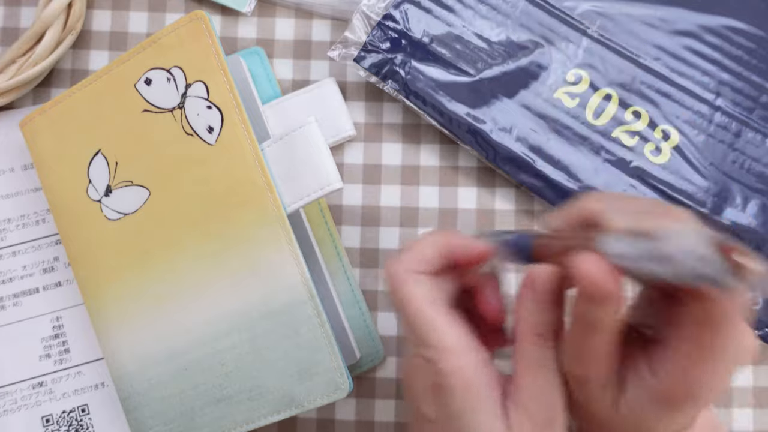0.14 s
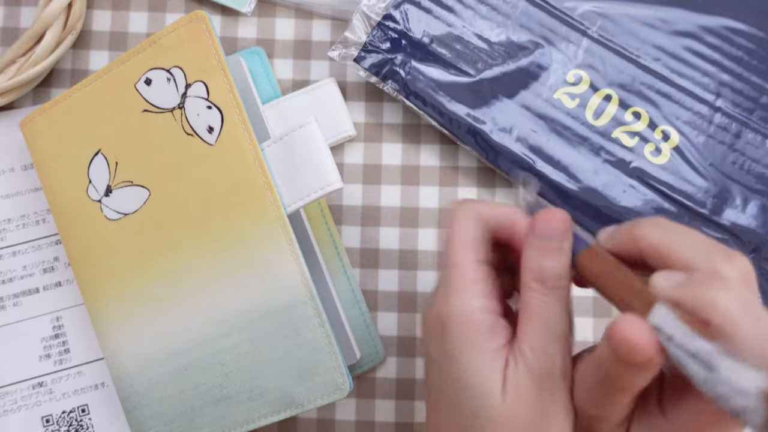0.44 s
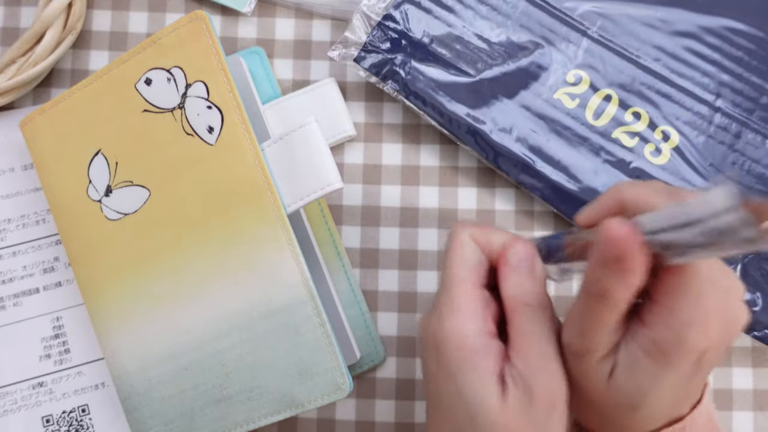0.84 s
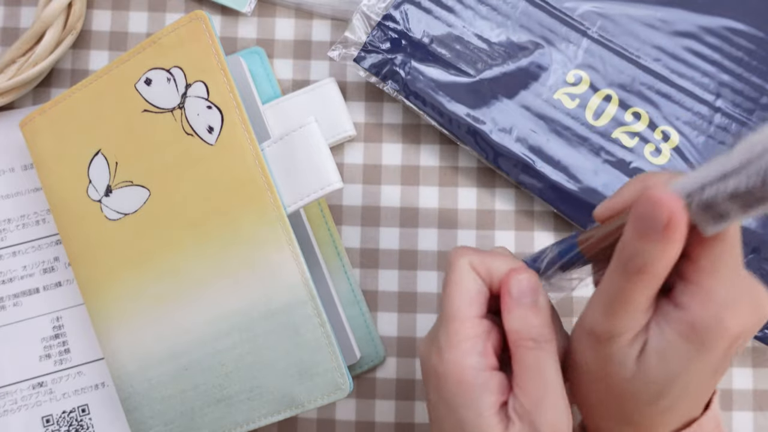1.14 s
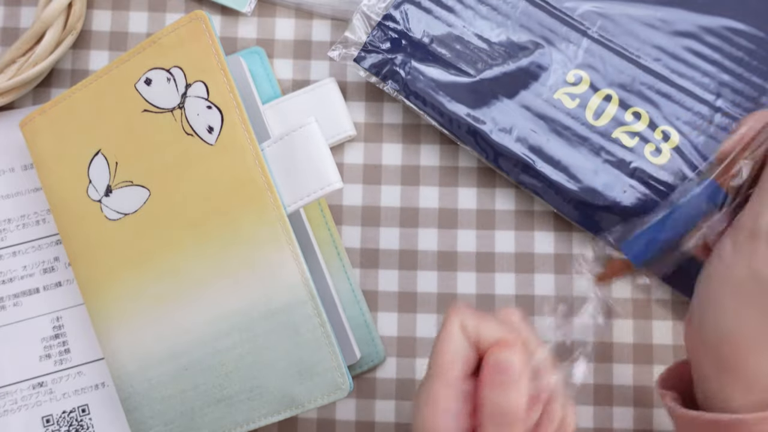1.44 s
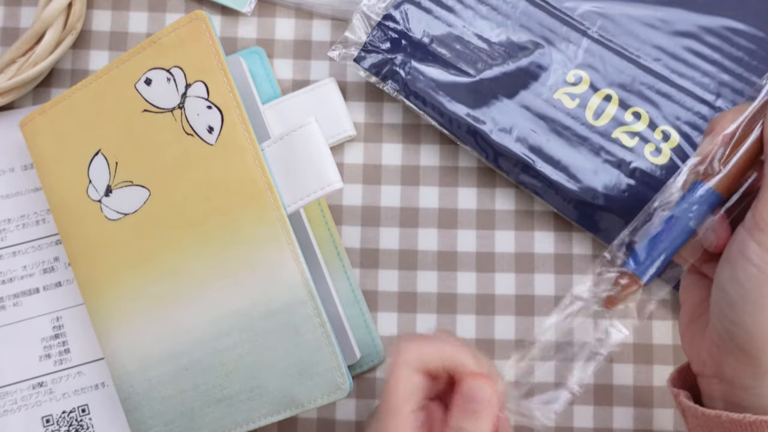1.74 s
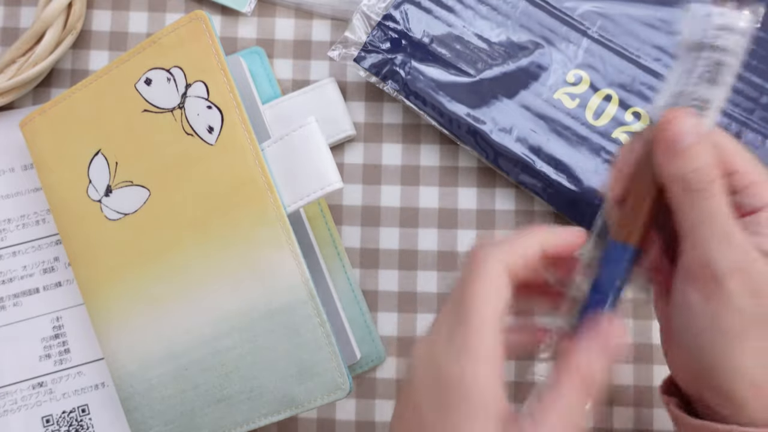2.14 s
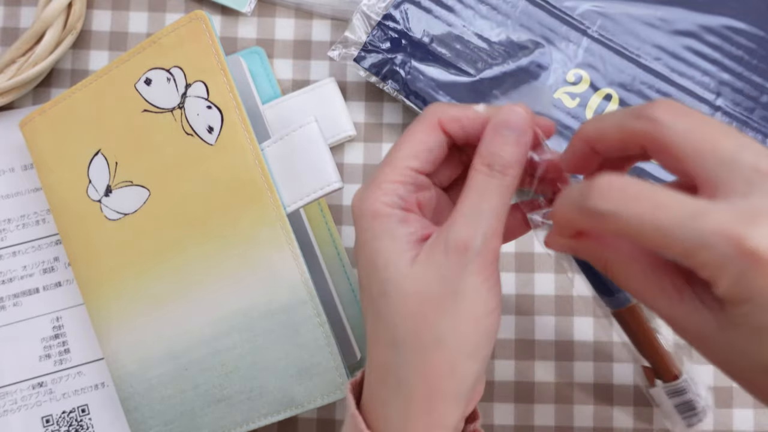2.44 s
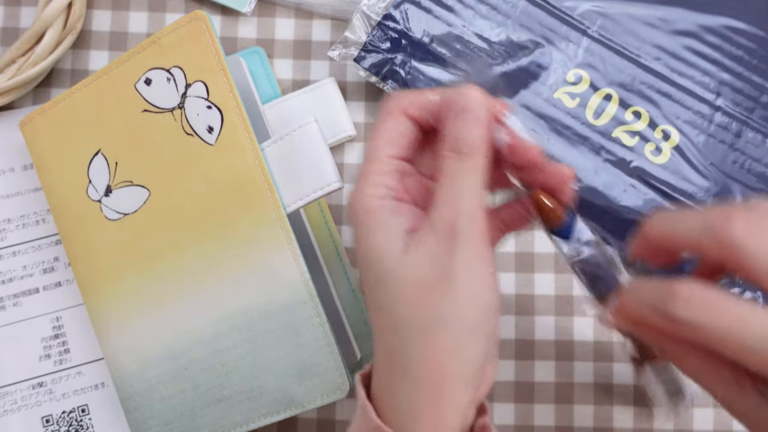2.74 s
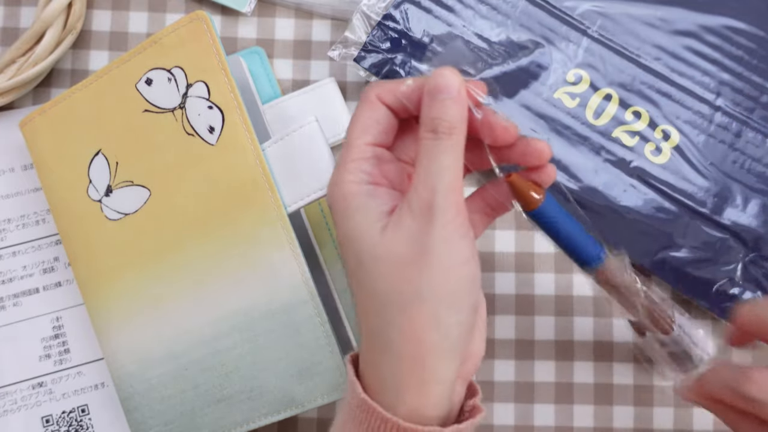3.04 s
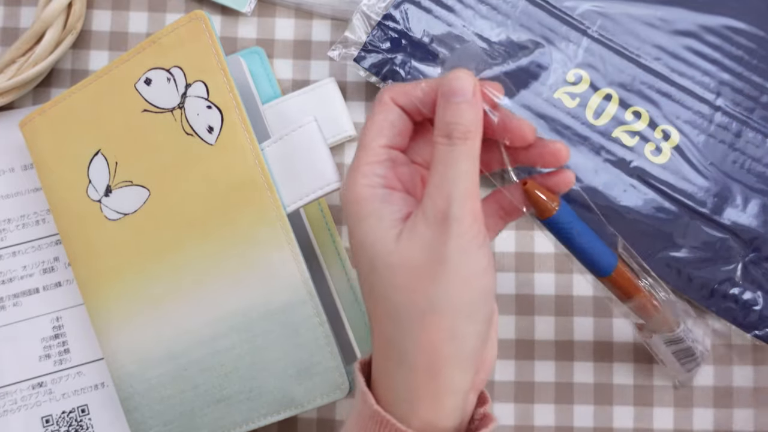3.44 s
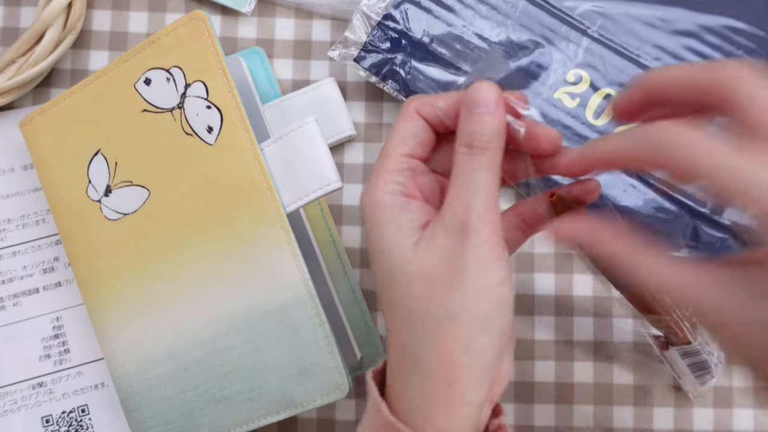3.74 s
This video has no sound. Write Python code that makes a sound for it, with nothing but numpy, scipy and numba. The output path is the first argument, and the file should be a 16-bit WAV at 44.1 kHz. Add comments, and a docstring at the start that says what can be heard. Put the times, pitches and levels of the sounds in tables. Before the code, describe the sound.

A thin plastic pen sleeve crinkles in hands: light scattered ticks, a dense bright crackling burst, a brief pause, then renewed scrunching that thins to sparse faint crackles. Close microphone, small quiet room, nearly mono.

```python
"""A small quiet room: two hands work a pen about in its thin clear plastic sleeve, close to a microphone.
Creases snap through one by one, each a tick and the brief ring of a patch of film. Under them lie a fine
crackle of tiny buckles and sliding film, gliding strokes and a dull finger rub; now and then something pops or
clicks. The film thins in tone as it is pulled taut. The hands pause, then grip again and scrunch the open end.
Quick reflections, a short room tail and steady room tone surround the sleeve, nearly mono."""
import sys
import numpy as np
from scipy import signal
from scipy.fft import rfft, irfft
from scipy.io import wavfile
from scipy.ndimage import uniform_filter1d, minimum_filter1d
from numba import njit

SR = 44100
rng = np.random.default_rng(int(sys.argv[2]) if len(sys.argv) > 2 else 0)


def unload_audio(sound):
    """Save the sound as a 16-bit wav file, at the path given as the first command line argument."""
    columns = np.transpose(np.atleast_2d(sound))
    # keep every value between -1 and 1, then stretch to whole-number steps
    steps = np.round(np.clip(columns, -1, 1) * 32767)
    wavfile.write(sys.argv[1], SR, steps.astype(np.int16))


N = 171990

# Large creases: flutter decay [s], trims of tick and ring [dB]
TICK_S, TICK_DB, RING_DB = 0.00044, -3.5, -4
TICK_BELOW, TICK_ABOVE = 0.25, 3.4  # edges of a snap's band, as multiples of its patch's pitch
AFTER_S, AFTER_DB = .0035, -8  # a snap sets off a neighbouring crease within this time
# Ringing patch: decay [s] at a reference pitch [Hz], rise [s], power by which higher pitches die sooner
RING_S, RING_AT_HZ, RISE_S, RING_SLOPE = 0.00057, 3000, 0.00029, .5
RING_SAG = 0.018  # share by which the pitch relaxes as the patch settles
# Fine crackle: mean rate, spread of buckle sizes [dB], sliding film against the buckles [dB]
BUCKLES_PER_S, BUCKLE_SPREAD_DB, SLIDE_DB = 950, 6, -9
BUCKLE_TICK = 1.88  # gain of a buckle's tick against a ring at RING_AT_HZ
LOW_HZ, MIDDLE_HZ, TREBLE_HZ = 319, 1100, 5000  # lower edges of the crackle's bands
# Treble above FIZZ_HZ gains FIZZ_GROWTH dB per dB of treble level over FIZZ_AT_DB, and loses as much under it
FIZZ_HZ, FIZZ_AT_DB, FIZZ_GROWTH = 10600, -27, .35
HOLLOW_WIDTH_HZ = 490  # bandwidth of each of the hollow's two poles
FILM_DAMPING = 1.082
POP_T60_S, POP_AT_HZ = 0.0085, 1000  # lower pops ring longer
POP_TICK_DB, POP_LOW_HZ = -9, 332  # level of the tick that starts a pop; pops carry little bass
DESK_DB, DESK_S = -9, 0.0059  # reflections: level, decay
ROOM_DB, SIDE_GAIN = -33.5, 0.052  # tail level; gain of the second tail that makes the side signal
AIR_DB = -59
CEILING, EDGE_HZ = .29, 15850  # limiter height, upper band edge


def amp(db):
    """Decibels to gain."""
    return 10 ** (np.asarray(db) / 20)


def unit(x):
    """Scales to rms 1."""
    return x / np.sqrt(np.mean(x ** 2) + 1e-20)


def read(points, hz):
    """Reads a table along log frequency."""
    f, value = np.transpose(points)
    return np.interp(np.log(hz + 1), np.log(f + 1), value)


def colour(x, points, size=2048):
    """Causal minimum-phase filter with the given spectrum; keeps the power of white noise."""
    log_gain = np.log(amp(read(points, abs(np.fft.fftfreq(size, 1 / SR)))))
    response = np.exp(np.conj(signal.hilbert(log_gain)))
    taps = np.fft.ifft(response).real[:size // 2]
    return signal.oaconvolve(x, taps / np.linalg.norm(taps))[:len(x)]


def above(x, hz, order=8):
    """The part of a sound above a soft edge; with what lies below it adds up to the whole."""
    f = np.fft.rfftfreq(N, 1 / SR)
    return irfft(rfft(x) * f ** order / (f ** order + float(hz) ** order), N)


def add(mix, s, sound):
    """Mixes a sound in at a time."""
    part = mix[max(round(s * SR), 0):][:len(sound)]
    part += sound[:len(part)]


def burst(x):
    """Gives a short sound the energy of 2 ms at rms 1."""
    return x * np.sqrt(.002 * SR / np.sum(x ** 2))


def tick(size=600):
    """A crease jumps: one sharp kick and a quickly dying flutter."""
    t = np.arange(size) / SR
    flutter = rng.standard_normal(size) * np.exp(-t / TICK_S)
    flutter[0] += 2 * rng.choice([-1, 1])
    return burst(flutter)


def ring(hz, size=900):
    """A patch of film swings for a few cycles, its pitch relaxing."""
    t = np.arange(size) / SR
    life = RING_S * (RING_AT_HZ / hz) ** RING_SLOPE
    turns = np.cumsum(hz * (1 + RING_SAG * (np.exp(-t / life) - .5))) / SR
    swing = np.sin(2 * np.pi * (turns + rng.random()))
    return burst((1 - np.exp(-t / RISE_S)) * np.exp(-t / life) * swing)


def snaps():
    """The large creases: a tick, a ring and a weaker after-tick; large patches tick duller than small ones."""
    # Creases snapping: (time [s], level before the tick and ring trims [dB], ring pitch [Hz])
    creases = [(0.0183, -28, 8450), (0.0427, -28.5, 8400), (0.1096, -27.5, 9200), (0.1576, -19.5, 6720),
               (0.177, -28.5, 3080), (0.232, -28.5, 7940), (0.2737, -21.5, 7700), (0.297, -27, 8000),
               (0.3141, -27, 7940), (0.3385, -21, 6420), (0.3536, -25, 2360), (0.399, -33, 6460),
               (0.4691, -43, 3270), (0.488, -51.5, 4400), (0.5393, -40.5, 1940), (0.583, -33.5, 7100),
               (0.6668, -35, 4900), (0.75, -16.5, 8360), (0.755, -20.5, 2480), (0.769, -14, 8500),
               (0.7974, -22, 5700), (0.8245, -30, 5300), (0.832, -21.5, 9500), (0.86, -25.5, 2980),
               (0.867, -20.5, 1560), (0.8708, -17, 1520), (0.8889, -20, 8700), (0.893, -23, 9150),
               (0.8981, -19.5, 1920), (0.9105, -21, 2560), (0.9172, -24, 3470), (0.9502, -19, 2220),
               (0.9865, -22.5, 9200), (0.9926, -25, 2560), (1.0155, -26, 3370), (1.049, -25.5, 1400),
               (1.0618, -24, 2520), (1.0913, -23, 2460), (1.106, -19, 9400), (1.1144, -22, 4700),
               (1.1373, -22, 3700), (1.1673, -26, 9400), (1.179, -23, 4520), (1.1826, -29, 1620),
               (1.2143, -23, 2240), (1.291, -23, 1930), (1.3047, -18, 6850), (1.311, -20.5, 2480),
               (1.3266, -11, 7900), (1.3346, -25, 1550), (1.355, -16, 8300), (1.3653, -18, 8700),
               (1.3697, -22.5, 9800), (1.382, -21, 5000), (1.3913, -15, 4370), (1.4, -20.5, 1810),
               (1.4226, -21.5, 1710), (1.4581, -23, 2040), (1.471, -17.5, 2980), (1.477, -16.5, 8800),
               (1.5486, -22, 3050), (1.5579, -21, 2980), (1.5618, -22, 6800), (1.5729, -17, 9350),
               (1.583, -19, 6940), (1.6009, -22, 8600), (1.6206, -23, 4730), (1.6327, -17.5, 8200),
               (1.6436, -29, 9800), (1.6645, -21.5, 8400), (1.6845, -22, 9100), (1.7117, -21, 3100),
               (1.744, -34, 5170), (1.7556, -31, 3250), (1.7917, -26, 8400), (1.801, -26.5, 3350),
               (1.8077, -22.5, 3240), (1.8455, -27, 3170), (1.8834, -28, 8700), (1.91, -30.5, 3900),
               (1.9379, -31.5, 5000), (2.069, -51, 3850), (2.2187, -30.5, 2720), (2.2317, -31, 7400),
               (2.2693, -21, 5560), (2.2776, -24, 3650), (2.3338, -28, 5760), (2.3649, -23, 5300),
               (2.3744, -23.5, 2980), (2.384, -20, 4270), (2.391, -21, 1980), (2.397, -19, 3000),
               (2.425, -22, 8400), (2.43, -17.5, 1100), (2.4356, -20.5, 8800), (2.456, -22.5, 1180),
               (2.4864, -19.5, 2860), (2.5279, -24, 1760), (2.5323, -17, 2670), (2.542, -12, 3060),
               (2.558, -19, 2860), (2.5707, -25, 980), (2.5754, -19.5, 3060), (2.5857, -24, 2900),
               (2.5943, -13, 2480), (2.602, -15, 2550), (2.607, -21.5, 1110), (2.614, -22.5, 1850),
               (2.6224, -22.5, 2940), (2.6283, -17, 5640), (2.6371, -26, 2350), (2.6425, -19, 8400),
               (2.6526, -16.5, 2920), (2.6629, -21.5, 2700), (2.678, -22, 7160), (2.6946, -22, 8400),
               (2.7088, -20.5, 3070), (2.734, -23, 5370), (2.7438, -31, 4650), (2.756, -15, 4700),
               (2.7797, -21, 1410), (2.8552, -25.5, 8500), (2.8739, -21, 3320), (2.885, -23.5, 8740),
               (2.9347, -16.5, 8400), (2.945, -23.5, 1120), (2.96, -25, 2110), (3.02, -18, 2020),
               (3.0292, -17.5, 8800), (3.0378, -21.5, 1330), (3.0547, -26, 1220), (3.0714, -22, 1040),
               (3.081, -19, 8800), (3.1066, -21, 9300), (3.1368, -22.5, 2580), (3.1574, -19.5, 7500),
               (3.181, -24, 9500), (3.1887, -19.5, 8400), (3.197, -26, 3850), (3.2497, -35, 8440),
               (3.323, -25, 2000), (3.4205, -27.5, 4500), (3.424, -29.5, 4800), (3.55, -35, 3600),
               (3.571, -35.5, 4330), (3.6462, -40, 2280), (3.6568, -38, 4380), (3.8538, -42, 5860)]
    # Colour of a tick: (frequency [Hz], relative level [dB])
    tick_colour = [(100, -29), (400, -7), (1000, 3), (2400, 5.5), (6300, 2.5), (8700, 5.5), (10500, -4.5),
                   (13500, -5), (16000, -14.5)]
    out = np.zeros(N)
    body = colour(np.r_[1, np.zeros(599)], tick_colour)
    for s, db, hz in creases:
        low, high = np.clip([hz * TICK_BELOW, hz * TICK_ABOVE], 1, .48 * SR)
        low_cut = signal.butter(2, low, "high", fs=SR, output="sos")
        high_cut = signal.butter(1, high, fs=SR, output="sos")
        band = np.vstack([low_cut, high_cut])
        for delay, drop_db in [(0, 0), (AFTER_S * rng.random(), AFTER_DB)]:
            crack = signal.sosfilt(band, np.convolve(tick(), body))
            add(out, s + delay, amp(db + TICK_DB + drop_db) * burst(crack))
        patch = signal.sosfilt(band, ring(hz))
        add(out, s, amp(db + RING_DB) * burst(patch))
    return out


def crackle(count=48):
    """Many tiny buckles of all sizes over the hiss of sliding film, swelling in three bands."""
    # Fine crackle before the band trims: (time [s], low level [dB], middle level [dB], treble level [dB])
    crackle_levels = [(0.019, -49.5, -36.5, -42.5), (0.093, -40, -35, -36), (0.139, -53, -50, -56),
                      (0.175, -64, -41, -41.5), (0.258, -62, -46, -51), (0.308, -55, -47, -46),
                      (0.337, -37.5, -34, -38), (0.419, -67, -49.5, -50), (0.504, -59, -78, -79),
                      (0.555, -74, -50, -45.5), (0.627, -70, -73, -68.5), (0.721, -48, -38, -38.5),
                      (0.893, -55, -35, -37.5), (1.247, -83, -37.5, -29), (1.491, -38, -35.5, -43.5),
                      (1.541, -56, -46, -41), (1.554, -33.5, -26.5, -46), (1.646, -69, -51, -42),
                      (1.684, -32, -30.5, -34.5), (1.746, -63, -54, -56.5), (1.821, -41, -34, -35),
                      (1.866, -64, -40, -43), (1.927, -44, -38, -37), (1.995, -67, -68.5, -83.5),
                      (2.156, -67.5, -74, -81.5), (2.223, -42, -33.5, -35.5), (2.255, -66, -48, -47),
                      (2.27, -44, -39.5, -37.5), (2.33, -57, -41.5, -37.5), (2.375, -44.5, -28, -31.5),
                      (2.43, -42, -35, -39.5), (2.569, -33, -26.5, -38.5), (2.699, -44.5, -40.5, -39),
                      (2.727, -33.5, -25.5, -30.5), (2.859, -35.5, -29.5, -39), (2.898, -35, -31, -34),
                      (3.159, -42.5, -31, -33), (3.218, -48, -49, -51), (3.288, -50.5, -45, -54.5),
                      (3.323, -42.5, -36.5, -45), (3.368, -54, -46.5, -51), (3.413, -53.5, -36.5, -38.5),
                      (3.502, -47, -62, -83), (3.542, -47, -45.5, -54), (3.677, -51, -41, -51),
                      (3.725, -50, -51, -64), (3.783, -47, -53.5, -63), (3.85, -58.5, -40, -38),
                      (3.896, -46.5, -36.5, -43)]
    # Colour of the fine crackle: (frequency [Hz], relative level [dB])
    film_colour = [(200, 0.5), (700, 2), (2500, 3), (3600, 0.5), (5000, 0.5), (6400, -4.5), (8600, 0.5),
                   (10500, -7.5), (13500, -10.5), (16000, -15)]
    # Trims of the bands: low [dB], middle [dB], treble [dB]
    band_trims = [-3.5, -5, -2.5]
    strength = amp(BUCKLE_SPREAD_DB * np.minimum(rng.exponential(1, N), 3.1))
    buckles = strength * (rng.random(N) < BUCKLES_PER_S / SR)
    patch = rng.integers(0, count, N)  # which pitch each buckle rings at
    slide = rng.standard_normal(N)
    grains = np.zeros(N)
    for k, hz in enumerate(np.geomspace(500, 14000, count)):
        grain = ring(hz) * np.sqrt(hz / RING_AT_HZ)
        add(grain, 0, BUCKLE_TICK * tick(size=40))
        grains += signal.oaconvolve(buckles * (patch == k), grain)[:N]
    film = colour(unit(grains) + amp(SLIDE_DB) * slide, film_colour)

    times, *columns = np.transpose(crackle_levels)
    levels = [np.interp(np.arange(N) / SR, times, column) for column in columns]
    low, middle, treble = (above(film, hz) for hz in (LOW_HZ, MIDDLE_HZ, TREBLE_HZ))
    out = np.zeros(N)
    for band, level, trim in zip([low - middle, middle - treble, treble], levels, band_trims):
        running_rms = np.sqrt(abs(uniform_filter1d(band ** 2, size=1500)) + 1e-12)
        out += amp(level + trim) * band / running_rms
    fizz_gain = amp(FIZZ_GROWTH * (levels[-1] - FIZZ_AT_DB))
    return out + above(out, FIZZ_HZ) * (fizz_gain - 1)


def strokes():
    """Grainy friction sounds the hollow of the sleeve, whose pitch glides as its shape changes."""
    # Strokes over the film: (time [s], length [s], level [dB], start pitch [Hz], end pitch [Hz])
    slides = [(0.39, 0.3, -63, 1420, 2230), (0.792, 0.68, -42.5, 2040, 2800), (1.548, 0.1, -38, 1100, 840),
              (2.733, 0.13, -33, 1470, 950), (2.81, 0.096, -30.5, 770, 576)]
    out = np.zeros(N)
    r = np.exp(-np.pi * HOLLOW_WIDTH_HZ / SR)
    for s, length, db, start_hz, end_hz in slides:
        done = np.clip((np.arange(N) / SR - s) / length, 0, 1)
        pitch = start_hz * (end_hz / start_hz) ** done
        turn = np.exp(2j * np.pi * np.cumsum(pitch) / SR)
        friction = rng.standard_normal(N) * rng.exponential(1, N)
        # Shift the gliding pitch down to zero, resonate there and shift back
        hollow = (turn * signal.lfilter([1], np.poly([r, r]), friction / turn)).real
        out += amp(db) * np.sin(np.pi * done) * unit(hollow)
    return out


@njit
def high_pass(x, step, damping):
    """Resonant high-pass whose edge moves from sample to sample."""
    out, low, band = np.zeros(len(x)), 0., 0.
    for i in range(len(x)):
        g = step[i]
        out[i] = (x[i] - (damping + g) * band - low) / (1 + g * (damping + g))
        low += 2 * g * (band + g * out[i])
        band += 2 * g * out[i]
    return out


def radiate(x):
    """The film radiates little below its lowest resonance, which rises as it is pulled taut."""
    # Lowest resonance of the free film, high when taut and low when slack: (time [s], frequency [Hz])
    tautness = [(0, 520), (0.27, 1000), (0.32, 380), (0.7, 350), (0.79, 800), (0.87, 720), (0.96, 1350),
                (1.29, 1000), (1.41, 470), (2.75, 450), (2.93, 268)]
    edge_hz = np.interp(np.arange(N) / SR, *np.transpose(tautness))
    step = np.tan(np.pi * edge_hz / SR)
    return high_pass(high_pass(x, step, FILM_DAMPING), step, FILM_DAMPING)


def pops(size=2000):
    """A pop or click: a tick, then a brief ring in a few modes."""
    # Pops and clicks, all ringing in one set of modes: (time [s], level [dB], lowest mode [Hz])
    knocks = [(0.315, -36, 296), (0.353, -37, 397), (0.3728, -29.5, 567), (0.6948, -26.5, 266),
              (1.6727, -25, 287), (2.9157, -23, 520), (2.964, -20.5, 316), (3.331, -30.5, 620),
              (3.525, -26, 1060), (3.6892, -30, 630)]
    # Modes of a pop or click: (multiple of the lowest mode, relative level [dB])
    pop_modes = [(1, -2.5), (2.81, 3), (3.55, 1.5), (5.3, -7)]
    t, out = np.arange(size) / SR, np.zeros(N)
    for s, db, hz in knocks:
        t60 = POP_T60_S * np.sqrt(POP_AT_HZ / hz)
        modes = np.zeros(size)
        for k, (ratio, mode_db) in enumerate(pop_modes):
            modes += amp(mode_db) * np.sin(2 * np.pi * hz * ratio * t) * (-1) ** k
        crack_hz = min(hz * pop_modes[-1][0] + 1500, .45 * SR)
        crack = signal.lfilter(*signal.butter(2, crack_hz, fs=SR), tick())
        add(out, s, amp(db) * burst(amp(-60 * t / t60) * modes))
        add(out, s, amp(db + POP_TICK_DB) * burst(crack))
    return signal.sosfilt(signal.butter(3, POP_LOW_HZ, "high", fs=SR, output="sos"), out)


def fingers(level_db=-2):
    """Skin rubs and nudges the sleeve: low-coloured noise makes a soft rustle."""
    # Dull rubbing on sleeve and pen, before the trim level_db: (time [s], level [dB])
    handling = [(2.3, -65), (2.85, -53.5), (3.78, -51), (3.9, -72)]
    # Colour of the rubbing: (frequency [Hz], relative level [dB])
    finger_colour = [(30, -47.5), (80, -16.5), (140, -7), (220, 2), (350, -4), (1200, -49)]
    level = np.interp(np.arange(N) / SR, *np.transpose(handling))
    return amp(level + level_db) * unit(colour(rng.standard_normal(N), finger_colour))


def desk(x, count=4, size=900):
    """Quick reflections off hands and desk that drift steadily between four sets."""
    t, out = np.arange(size) / SR, np.zeros(N)
    place = np.arange(N) / SR * 4.846  # crossfades per second between sets of reflections
    for k in range(count):
        sparse = rng.standard_normal(size) * (rng.random(size) < .1)
        taps = sparse * (t > .0008) * np.exp(-t / DESK_S)
        share = np.maximum(1 - abs((place - k) % count - 1), 0)
        out += signal.oaconvolve(x * np.sqrt(share), taps / np.linalg.norm(taps))[:N]
    return amp(DESK_DB) * out


def room(x, size=16384):
    """A short diffuse tail of decaying noise, each frequency dying at its own rate."""
    # Room decay: (frequency [Hz], time to fall 60 dB [s])
    decay_times = [(300, 0.38), (2000, 0.15), (8000, 0.18), (15000, 0.41)]
    hz, t, z = signal.stft(rng.standard_normal(size), SR, nperseg=256)
    fade = amp(-60 * t / read(decay_times, hz)[:, None])
    tail = signal.istft(z * fade, SR)[1]
    tail *= np.minimum(np.arange(len(tail)) / SR / .005, 1)  # builds up over 5 ms
    return amp(ROOM_DB) * signal.oaconvolve(x, tail / np.linalg.norm(tail))[:N]


def air():
    """Room tone: steady coloured noise."""
    # Colour of the room tone: (frequency [Hz], relative level [dB])
    air_colour = [(25, -28), (260, 3), (420, -0.5), (1900, -10.5), (3300, -27.5), (16000, -43)]
    return amp(AIR_DB) * unit(colour(rng.standard_normal(N), air_colour))


def scene():
    """Everything sits in the centre, nearly mono; a very faint side signal is made from a second tail."""
    film = radiate(snaps() + crackle() + strokes())
    sleeve = film + pops() + fingers()
    mid = sleeve + desk(sleeve) + room(sleeve) + air()
    side = SIDE_GAIN * room(sleeve)
    return np.array([mid + side, mid - side])


def record(dry, size=45):
    """A fast limiter holds the tallest snaps to one height; then the band limit."""
    gain = CEILING / np.maximum(abs(dry).max(0), CEILING)
    held = dry * uniform_filter1d(minimum_filter1d(gain, size), size)
    low_pass = signal.firwin(601, EDGE_HZ, window=("kaiser", 9), fs=SR)
    return signal.oaconvolve(held, low_pass[None], "same")


dry = scene()
out = record(dry)
unload_audio(out)
```